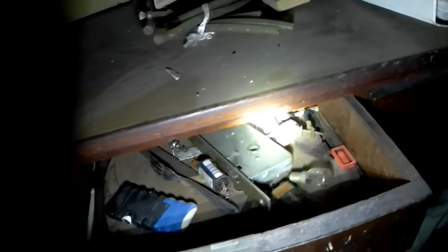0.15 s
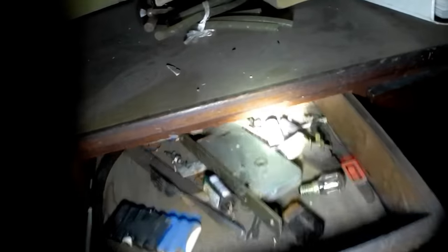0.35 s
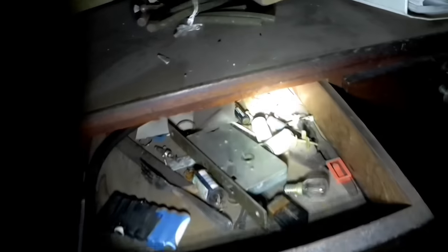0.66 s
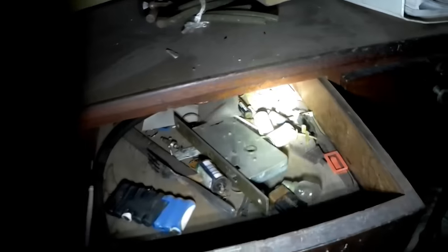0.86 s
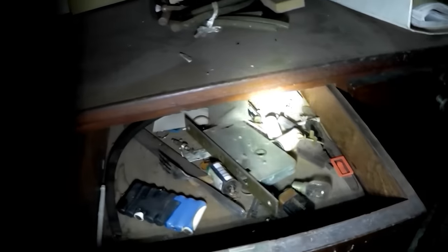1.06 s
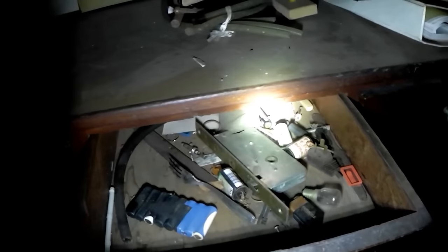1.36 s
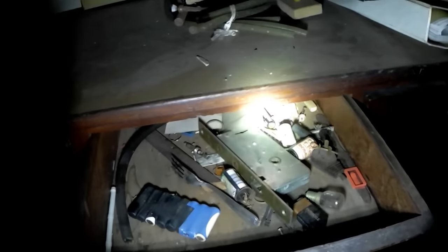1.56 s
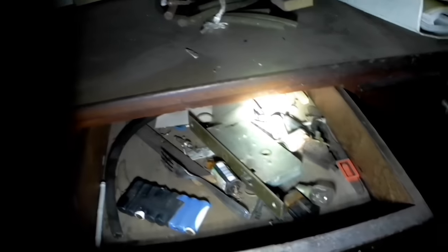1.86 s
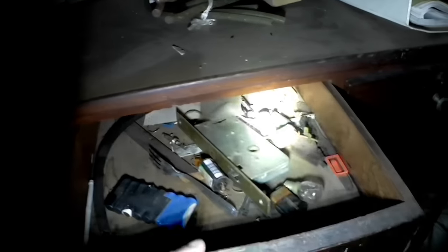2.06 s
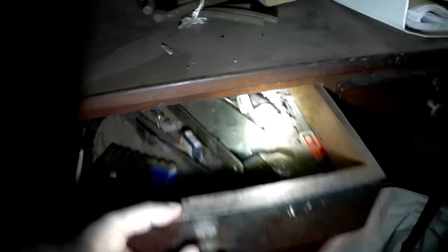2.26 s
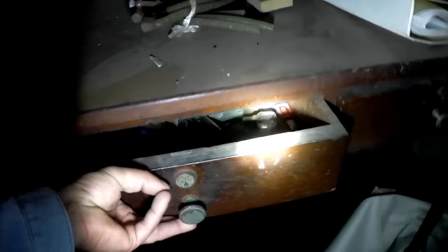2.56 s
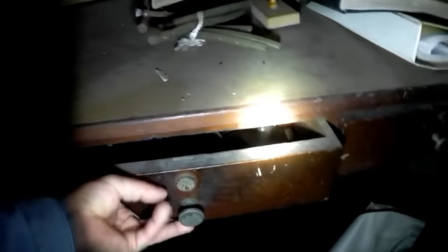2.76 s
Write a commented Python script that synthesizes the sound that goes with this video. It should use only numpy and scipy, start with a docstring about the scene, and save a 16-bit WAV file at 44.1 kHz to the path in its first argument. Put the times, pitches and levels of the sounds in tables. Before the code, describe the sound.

An old wooden desk drawer is tugged further open with a juddering scrape and knocks. Loose tools click and ping inside. After a pause it scrapes back in with a sharp clack, close by in a bare room.

```python
"""A knock and a low judder: an old wooden desk drawer full of tools is tugged further open, close by.
Stick-slip on the runners makes it scrape, hiss and groan; bumps in the frame ring the desk.
Loose things click and tap; a piece of metal pings, then skids. After a pause the drawer is shoved
back in with a long dry scrape and one sharp clack. Bare room, quiet noise floor, faint high whine."""
import sys
import numpy as np
from scipy import signal
from scipy.fft import rfft, irfft
from scipy.io import wavfile

SR = 44100
rng = np.random.default_rng(int(sys.argv[2]) if len(sys.argv) > 2 else 0)


def master(y):
    """Save y as 16-bit WAV."""
    cut = np.clip(np.atleast_2d(y).T, -1, 1)
    pcm = np.round(cut * 32767)  # scale
    wavfile.write(sys.argv[1], SR, pcm.astype(np.int16))


N = 127890
T = np.arange(N) / SR
RING_T = T[:SR // 2]

# Stroke envelopes: t/s, judder/dB, scrape/dB, hiss/dB
PULL_LEVELS = [(0, -26, -39.5, -50), (.09, -45, -54, -56.5), (.115, -42, -39, -56), (.16, -53, -30.5, -45),
               (.195, -30, -27.5, -42), (.22, -18.5, -22, -29), (.255, -25, -17, -29.5),
               (.285, -31, -25, -38), (.35, -27.5, -22.5, -41.5), (.44, -23, -27.5, -43.5),
               (.56, -36, -44, -55), (.66, -40, -46.5, -52), (.8, -37.5, -43.5, -53), (.95, -42, -47, -53),
               (1.02, -72, -41, -56.5), (1.07, -46.5, -49.5, -56), (1.3, -66, -57.5, -64),
               (1.5, -66, -65, -85)]
PUSH_LEVELS = [(1.93, -63, -56, -103), (2.02, -44, -56.5, -63), (2.07, -46.5, -51, -66),
               (2.125, -33, -30, -46), (2.17, -26.5, -27, -41), (2.24, -24, -21.5, -37.5),
               (2.3, -24.5, -25.5, -39), (2.38, -27, -24.5, -41), (2.45, -27, -29.5, -43.5),
               (2.49, -30.5, -35, -49.5), (2.555, -32, -33, -48.5), (2.625, -30.5, -28.5, -41.5),
               (2.675, -30.5, -35.5, -50.5), (2.735, -33, -44.5, -55.5), (2.785, -44, -52, -54.5),
               (2.85, -44.5, -48.5, -56), (2.88, -51, -41.5, -61), (2.9, -43, -45, -61)]
# Rubbing wood spectra: f/Hz, relative density/dB
JUDDER_SPECTRUM = [(25, -28), (55, -14), (130, -8.5), (210, -8), (300, -3.5), (420, -6), (700, -6.5),
                   (1100, -15), (2000, -46)]
PULL_SPECTRUM = [(200, -23), (700, -1), (1120, 4.5), (1400, 0), (2000, -2), (2500, -1.5), (3100, -8.5),
                 (4500, -18), (8000, -38)]
PUSH_SPECTRUM = [(200, -48), (600, -1.5), (900, 1.5), (1350, -1), (1850, -5), (2400, -2.5), (3000, -9),
                 (4500, -17), (8000, -42)]
HISS_SPECTRUM = [(2000, -7), (3600, -2), (5400, 0), (6600, 4.5), (8300, -0.5), (9500, -6), (12300, -4.5),
                 (15500, -35)]
# Binding: centre t/s, half-width/s, level/dB, slip rate/Hz, octave/dB
GROANS = [(0.251, 0.017, -9.5, 198.8, -3.5), (0.354, .014, -28.5, 2600, -26),
          (0.493, 0.0071, -27, 880, -22), (2.166, .014, -23.5, 2482, -26), (2.327, 0.056, -32.5, 2425, -26),
          (2.29, .06, -36.5, 56.6, -12), (2.54, 0.019, -31.5, 204.5, -14), (2.627, 0.022, -30, 849, -27),
          (2.632, 0.025, -28, 366, -18), (2.705, 0.05, -36.5, 463.6, -22), (2.695, 0.026, -34.5, 558, -22)]
# Wood on wood: t/s, level/dB, low-pass/Hz, high-pass/Hz, rattle/dB
KNOCKS = [(.001, -21, 875, 70, -2.5), (0.2121, -12.5, 2200, 150, 0.5), (.229, -5, 1420, 190, -4),
          (0.2516, -8, 1200, 55, -1), (.261, -11, 1210, 50, 2), (.282, -15.5, 1500, 200, 4.5),
          (0.3775, -7, 788, 64.6, -5), (.401, -14, 1170, 190, -2), (0.489, -30, 1210, 116.6, 8.5),
          (0.864, -10.5, 560, 254, -8), (.875, -15, 1140, 55, 1), (0.9, -27.5, 700, 70, 4.5),
          (2.214, -10.5, 794, 179, -5.5), (2.231, -24, 900, 160, 9), (2.37, -20, 500, 70, 1.5),
          (2.429, -30, 700, 60, -12), (2.734, -32.5, 1200, 298, 7.5)]
# Drawer and desk modes: f/Hz, pulled level/dB, pushed level/dB, t60/s
DESK_MODES = [(59.5, -8, -6, 0.088), (95.3, -2.5, -10, 0.12), (153, -7, -16, 0.15), (194, -6.5, 6.5, 0.065),
              (235.7, 1, 1, 0.16), (255, -0.5, 0.5, .1), (321, -9.5, -27, 0.17), (372.8, 1.5, -0.5, 0.18),
              (434.2, -16, -5, 0.44), (453.6, -11.5, -27, 0.24), (499, -2, -15, 0.3), (565.7, -5, -5, 0.24),
              (631, -16, -8, 0.19), (742, -7, -9, 0.14), (828, -11.5, -3.5, 0.24), (921, -7.5, -23, 0.13),
              (1096, -25, -9, 0.079), (1181, -8.5, -7, 0.24), (1214, -6.5, -5, 0.12),
              (1547, -15, -14, 0.27)]
# Small hard things colliding: t/s, level/dB
CLICKS = [(0.8155, -26), (0.8382, -21.5), (2.165, -18)]
# Hard things on the drawer floor: t/s, level/dB, low-pass/Hz
TAPS = [(.4885, -15.5, 2220), (.528, -27, 3010), (.5505, -20, 3230), (.598, -21.5, 2220), (.722, -20, 1090),
        (1.284, -35.5, 2500), (1.318, -31.5, 1190), (2.872, -29, 2780)]
# Modes of loose things and drawer front (clack): f/Hz, level/dB, t60/s
BUZZ_MODES = [(1934, 2.5, 0.12), (2330, 1, 0.15), (2504, -1, 0.12)]
CLICK_MODES = [(2060, -5, 0.013), (2190, -4.5, 0.022), (2337, -10, 0.035), (2513, -2.5, 0.035),
               (2900, -8, 0.015)]
PING_MODES = [(1210, -1, 0.091), (2410, -8, .05), (3446, -2, 0.056), (6040, -10.5, 0.11), (6170, -2, 0.03),
              (6700, -2, 0.011), (7970, -5, 0.018)]
SKID_MODES = [(1945, 8, 0.015), (2450, 0, 0.012), (3500, -9, .025), (3760, 0, 0.019), (4630, -1, 0.015)]
CLACK_MODES = [(885, -21, 0.034), (1136, 2, 0.034), (1405, -8, 0.052), (1506, -2, 0.051),
               (1710, -1.5, 0.029), (1925, -2, 0.04), (2100, -7, 0.039), (2275, -2, 0.062)]
# Panel rattle, tap and background spectra: f/Hz, relative density/dB
RATTLE_SPECTRUM = [(40, -13), (150, -4), (380, -5), (900, -8), (1600, -9), (2500, -10), (3400, -11),
                   (6500, -20), (15000, -72)]
TAP_SPECTRUM = [(100, -10), (450, -4), (1100, -0.5), (2300, -5.5), (4200, -10), (12000, -5)]
BACKGROUND_SPECTRUM = [(15, -36), (25, -2), (204, -3.5), (246, -4.5), (457, -6.5), (537, -7), (1200, -12.5),
                       (1800, -14.5), (2420, -17.5), (15500, -28.5)]
# Decay by band: f/Hz, t60/s
RATTLE_DECAY = [(100, 0.53), (600, 0.13), (2000, 0.077), (10000, 0.065)]
TAP_DECAY = [(300, 0.066), (2000, 0.071), (8000, 0.033)]
ROOM_DECAY = [(80, 0.16), (400, 0.55), (2000, 0.62), (10000, 0.47)]


def slide(stroke, scrape_spectrum, chatter_db=0.25, chatter_hz=69, ring_db=-1.5, buzz_db=-13):
    """Drawer drags on its runners: the box judders, wood scrapes and hisses, loose metal buzzes."""
    times_s, *levels_db = np.transpose(stroke)
    judder_gain, scrape_gain, hiss_gain = (
        amp(np.interp(T, times_s, db)) * (T >= times_s[0]) for db in levels_db)
    drive = slips() * amp(chatter_db * wander(chatter_hz))
    judder = unit(colour(slips(), JUDDER_SPECTRUM) + amp(ring_db) * rubbed(desk_modes(times_s[0])))
    scrape = colour(drive, scrape_spectrum) + amp(buzz_db) * rubbed(BUZZ_MODES)
    hiss = colour(slips() + 0.99 * rng.standard_normal(N), HISS_SPECTRUM)
    return judder_gain * judder + scrape_gain * scrape + hiss_gain * hiss


def slips(rate_per_s=3000, smooth_gain=0.71):
    """Stick-slip: tiny randomly timed jerks over smooth rubbing."""
    jerks = rng.choice([-1, 1], N) * (rng.random(N) < rate_per_s / SR)
    return unit(unit(jerks) + smooth_gain * rng.standard_normal(N))


def rubbed(modes):
    """Modes driven by stick-slip, rms 1."""
    return unit(through(slips(), ring(modes)))


def desk_modes(at_s, push_from_s=1.9):
    """Pulling and pushing load the desk's modes differently."""
    return [(hz, push_db if at_s > push_from_s else pull_db, t60_s)
            for hz, pull_db, push_db, t60_s in DESK_MODES]


def groans(wobble_depth=0.0348, wobble_hz=45.4):
    """The drawer binds: slips fall into step and the wood groans or squeaks."""
    out = np.zeros(N)
    for at_s, width_s, db, slip_hz, octave_db in GROANS:
        pitch_hz = slip_hz * (1 + wobble_depth * wander(wobble_hz))
        phase = 2 * np.pi * np.cumsum(pitch_hz) / SR
        tone = unit(np.sin(phase) + amp(octave_db) * np.sin(2 * phase))
        out += amp(db) * tone * swell(at_s, width_s)
    return out


def knocks(contact_s=0.0019, punch_db=7, punch_s=0.032, damping_db_per_s=61):
    """Bumps in the frame ring the desk and rattle panels; soft contact dulls them, the hand damps them."""
    out = np.zeros(N)
    fall_db = punch_db * np.exp(-RING_T / punch_s) - damping_db_per_s * RING_T
    envelope = rise(contact_s) * amp(fall_db)
    for at_s, db, low_pass_hz, high_pass_hz, rattle_db in KNOCKS:
        rattle = amp(rattle_db) * burst(RATTLE_SPECTRUM, RATTLE_DECAY)
        body = ring(desk_modes(at_s), spread_db=2)
        blow = cut((0.27 * body + 0.64 * rattle) * envelope, low_pass_hz, "low")
        add(out, at_s, amp(db) * cut(blow, high_pass_hz, "high"))
    return out


def clack(at_s=2.2098, db=-11):
    """The drawer front catches and rings briefly."""
    out = np.zeros(N)
    add(out, at_s, amp(db) * strike(CLACK_MODES))
    return out


def contents():
    """Loose things click together and tap the drawer floor."""
    out = np.zeros(N)
    for at_s, db in CLICKS:
        add(out, at_s, amp(db) * strike(CLICK_MODES, spread_db=2.5))
    for at_s, db, low_pass_hz in TAPS:
        add(out, at_s, amp(db) * cut(burst(TAP_SPECTRUM, TAP_DECAY), low_pass_hz, "low"))
    return out


def metal_piece(ping_s=0.5975, ping_db=-28, skid_s=0.748, skid_width_s=0.23, skid_db=-42.5):
    """Metal pings when tapped; friction rings it as it skids."""
    out = amp(skid_db) * rubbed(SKID_MODES) * swell(skid_s, skid_width_s)
    add(out, ping_s, amp(ping_db) * strike(PING_MODES))
    return out


def room(x, tail_db=-14.5, build_s=0.0075):
    """Bare walls add a short diffuse tail."""
    tail = die_away(rng.standard_normal(len(RING_T)), ROOM_DECAY)
    onset = 1 - np.exp(-(RING_T / build_s) ** 2)
    return x + amp(tail_db) * through(x, tail * onset)


def background(db=-47.5):
    """Steady quiet noise, strongest in the bass."""
    return amp(db) * colour(rng.standard_normal(N), BACKGROUND_SPECTRUM)


def whine(hz=10700, t60_s=0.0091, pulse_hz=18, db=-68.5):
    """Faint narrow band of hiss, pulsing fast."""
    pulsing = (1 + np.cos(2 * np.pi * pulse_hz * T)) ** 2
    band = through(rng.standard_normal(N), ring([(hz, 0, t60_s)]))
    return amp(db) * unit(band * pulsing)


def ring(modes, spread_db=0):
    """Decaying sines, signs flipping in pairs; spread_db varies their balance as a strike point does."""
    offsets_db = spread_db * rng.standard_normal(len(modes))
    out = np.zeros(len(RING_T))
    for k, (hz, db, t60_s) in enumerate(modes):
        envelope = amp(db + offsets_db[k] - 60 * RING_T / t60_s)
        out += (-1) ** (k // 2) * envelope * np.sin(2 * np.pi * hz * RING_T)
    return out


def strike(modes, spread_db=0, contact_s=0.00045):
    """Modes rung by a hard contact."""
    return rise(contact_s) * ring(modes, spread_db)


def burst(spectrum, decay):
    """Dense modes as decaying coloured noise."""
    return die_away(colour(rng.standard_normal(len(RING_T)), spectrum), decay)


def die_away(x, decay):
    """Fade each band at its own t60."""
    hz, t, bands = signal.stft(x, SR, nperseg=256)
    fade = amp(-60 * t / read(decay, hz)[:, None])
    return signal.istft(bands * fade, SR)[1][:len(x)]


def rise(contact_s):
    """Exponential attack."""
    return 1 - np.exp(-RING_T / contact_s)


def swell(at_s, width_s):
    """Gaussian envelope."""
    return np.exp(-((T - at_s) / width_s) ** 2)


def wander(hz):
    """Low-passed noise, rms 1."""
    return unit(signal.sosfilt(signal.butter(2, hz, fs=SR, output="sos"), rng.standard_normal(N)))


def colour(x, spectrum):
    """Impose a spectrum, rms 1."""
    gain = amp(read(spectrum, np.fft.rfftfreq(len(x), 1 / SR)))
    return unit(irfft(rfft(x) * gain, len(x)))


def cut(x, hz, kind):
    """Second-order low- or high-pass."""
    return signal.lfilter(*signal.butter(2, hz, kind, fs=SR), x)


def through(x, response):
    """Convolve with a response scaled to unit energy."""
    return signal.fftconvolve(x, response / np.linalg.norm(response))[:N]


def read(table, hz):
    """Interpolate over log frequency."""
    table_hz, values = np.transpose(table)
    return np.interp(np.log(hz + 1), np.log(table_hz + 1), values)


def add(mix, at_s, sound):
    """Mix in at a time."""
    part = mix[round(at_s * SR):][:len(sound)]
    part += sound[:len(part)]


def amp(db):
    """dB to gain."""
    return 10 ** (np.asarray(db) / 20)


def unit(x):
    """Scale to rms 1."""
    return x / np.sqrt(np.mean(x ** 2) + 1e-20)


def scene():
    """Drawer and contents in the room, over the background; mono."""
    friction = slide(PULL_LEVELS, PULL_SPECTRUM) + slide(PUSH_LEVELS, PUSH_SPECTRUM) + groans()
    drawer = friction + knocks() + clack() + contents() + metal_piece()
    return (room(drawer) + background() + whine())[None]


def record(dry):
    """Clip at full scale, then band-limit."""
    edge_hz = 15650
    low_pass = signal.firwin(511, edge_hz, window=("kaiser", 9), fs=SR)
    return signal.oaconvolve(np.clip(dry, -1, 1), low_pass[None], "same")


dry = scene()
out = record(dry)
master(out)
```